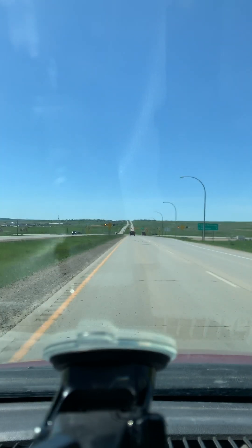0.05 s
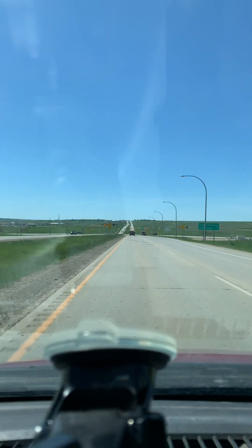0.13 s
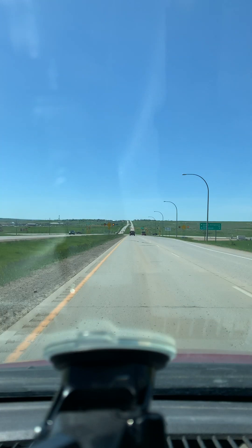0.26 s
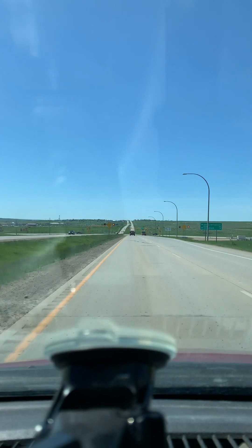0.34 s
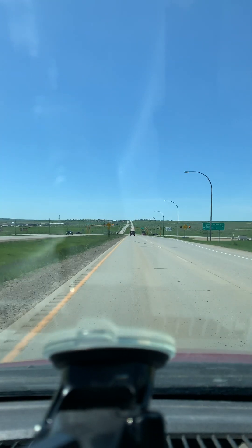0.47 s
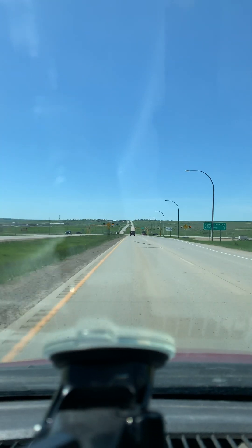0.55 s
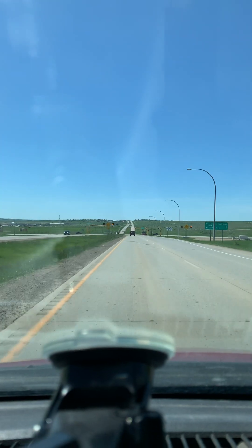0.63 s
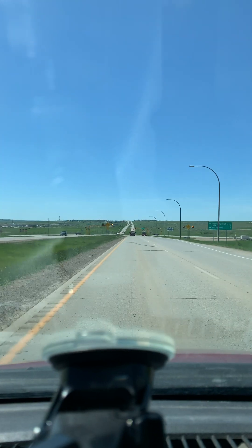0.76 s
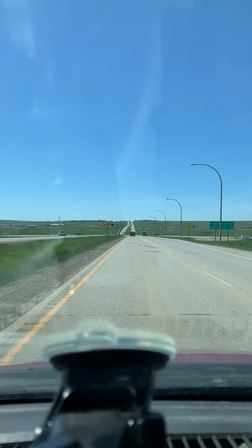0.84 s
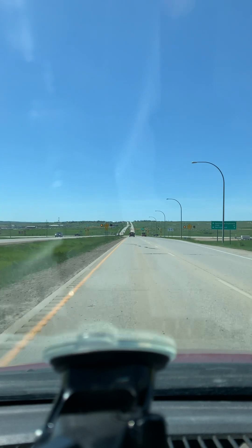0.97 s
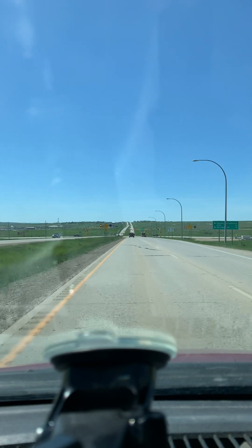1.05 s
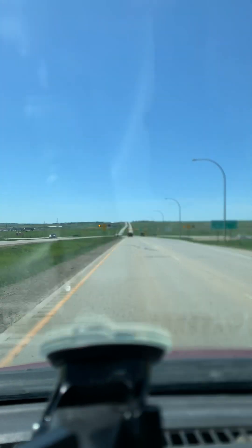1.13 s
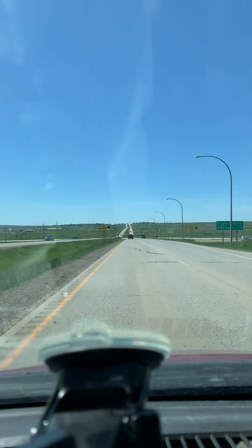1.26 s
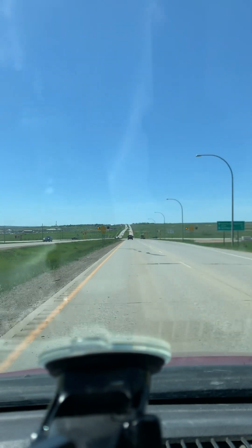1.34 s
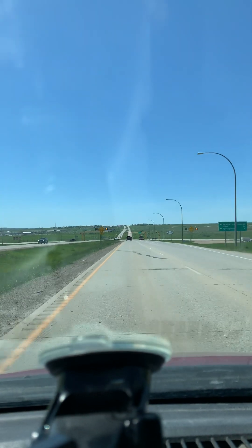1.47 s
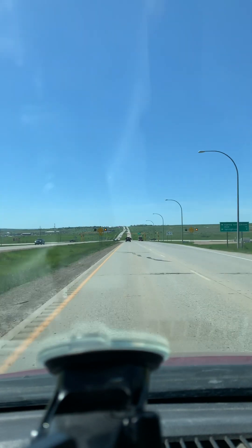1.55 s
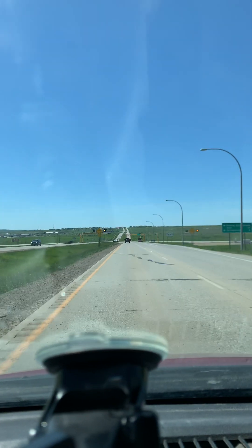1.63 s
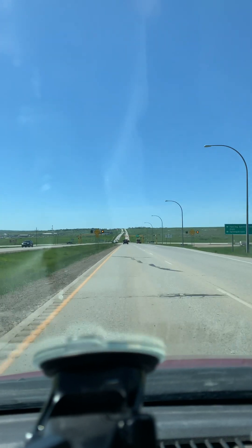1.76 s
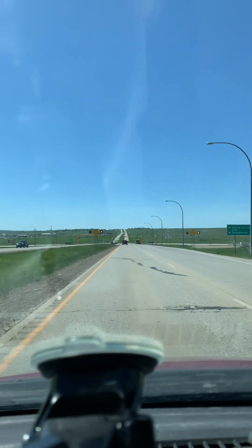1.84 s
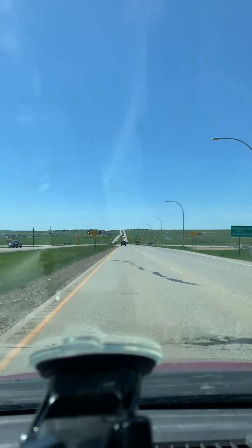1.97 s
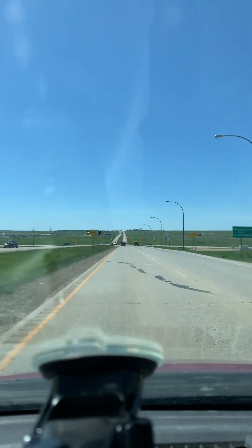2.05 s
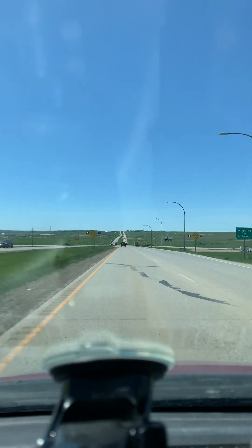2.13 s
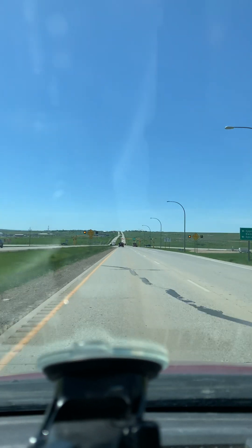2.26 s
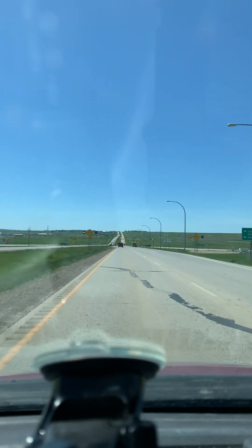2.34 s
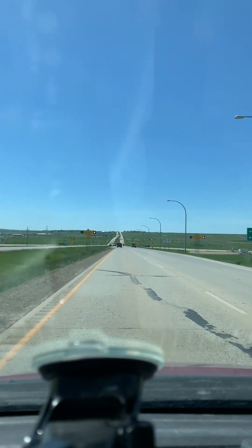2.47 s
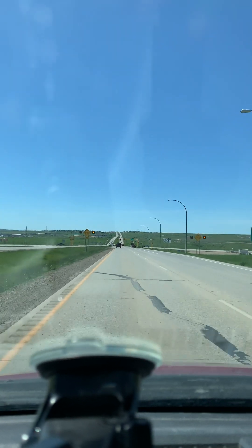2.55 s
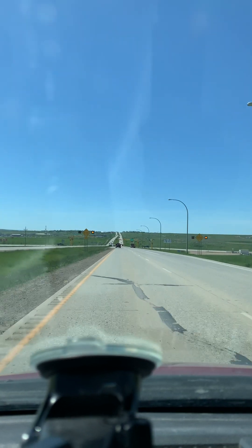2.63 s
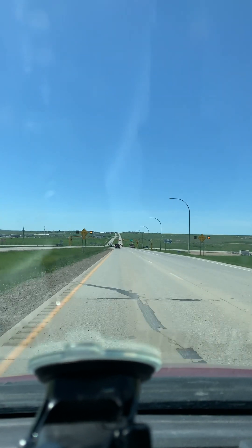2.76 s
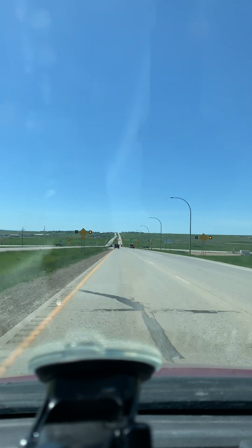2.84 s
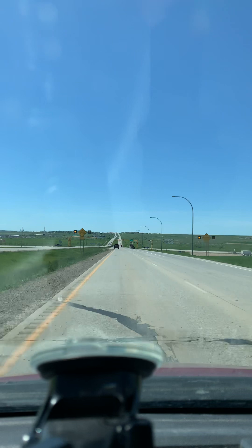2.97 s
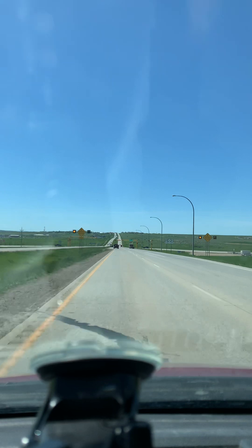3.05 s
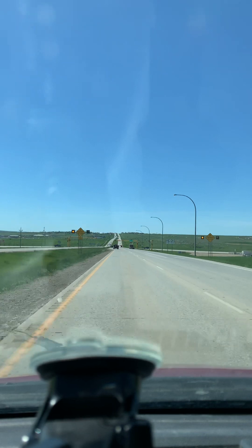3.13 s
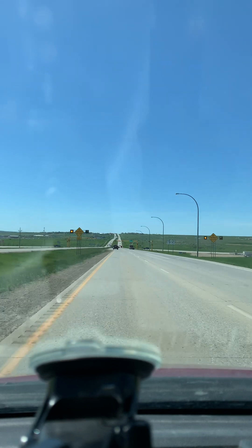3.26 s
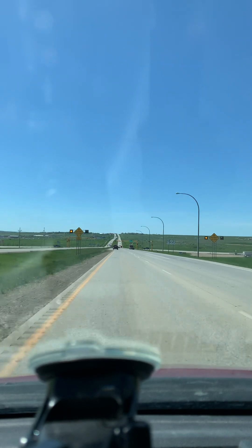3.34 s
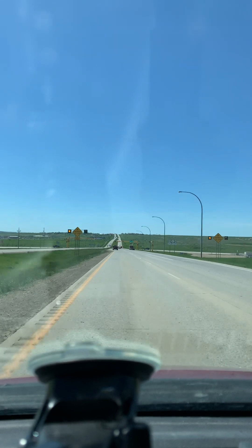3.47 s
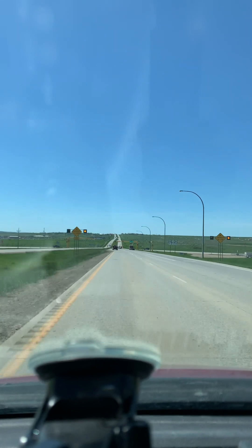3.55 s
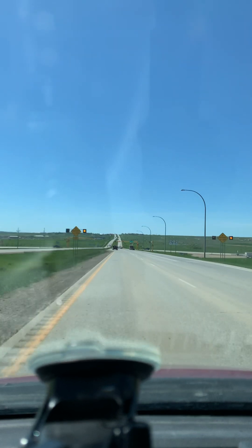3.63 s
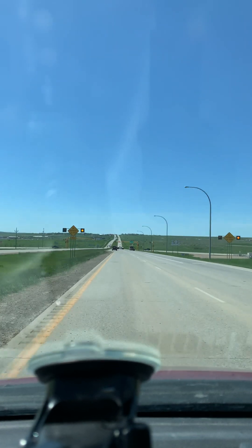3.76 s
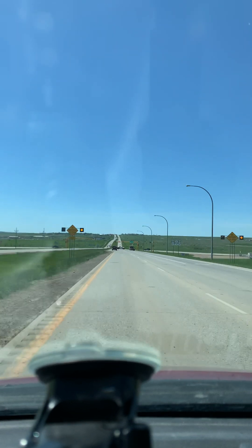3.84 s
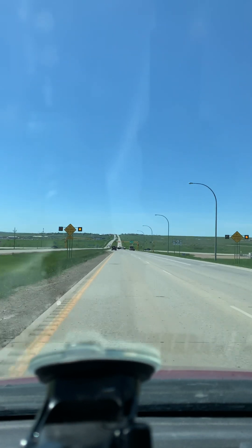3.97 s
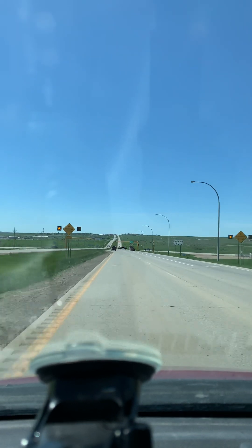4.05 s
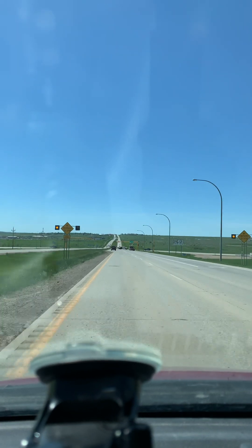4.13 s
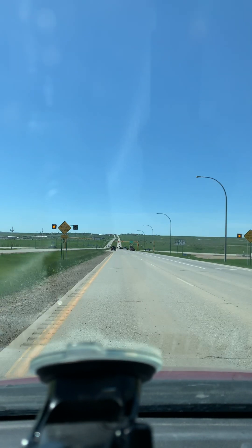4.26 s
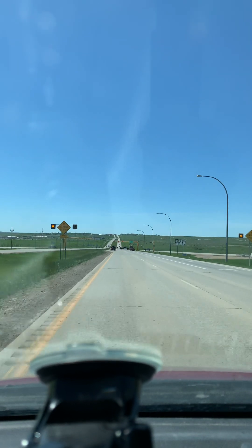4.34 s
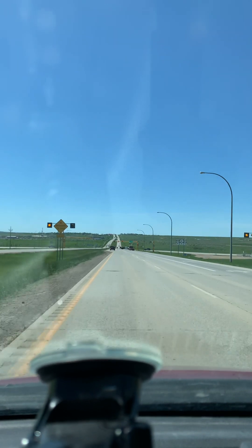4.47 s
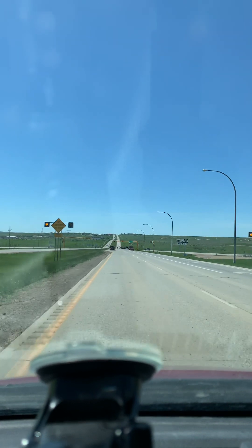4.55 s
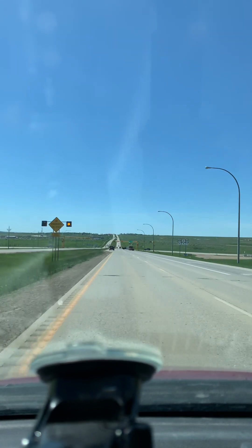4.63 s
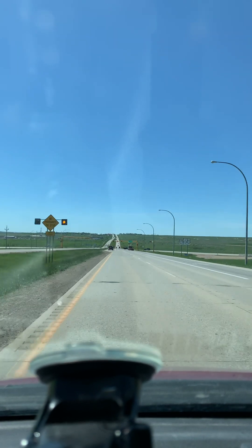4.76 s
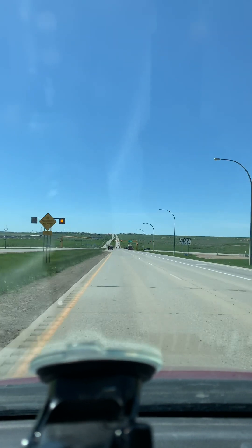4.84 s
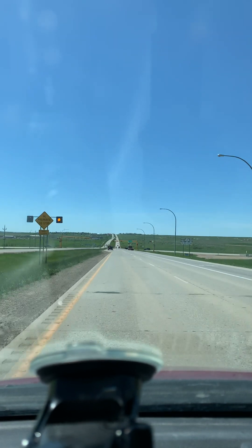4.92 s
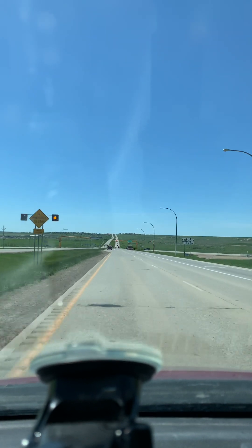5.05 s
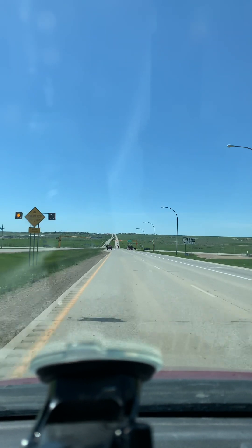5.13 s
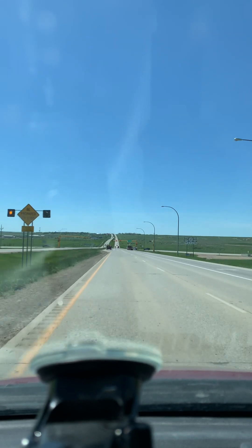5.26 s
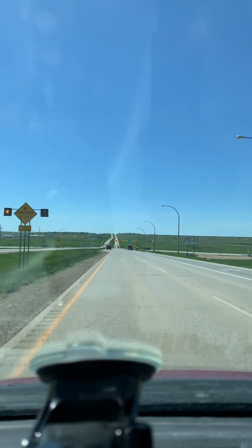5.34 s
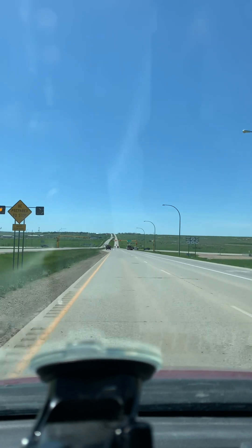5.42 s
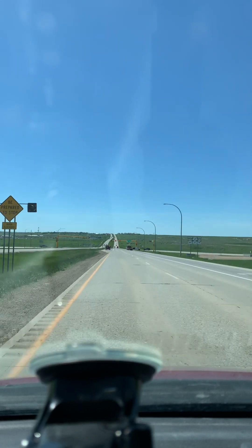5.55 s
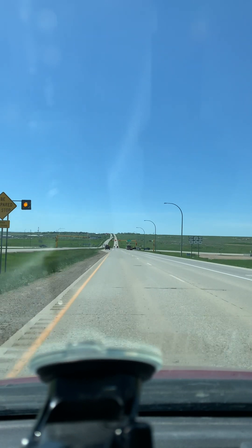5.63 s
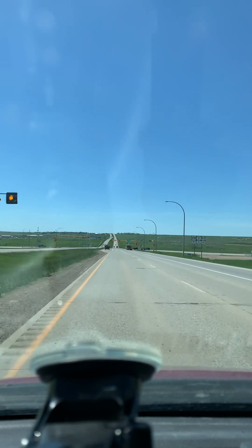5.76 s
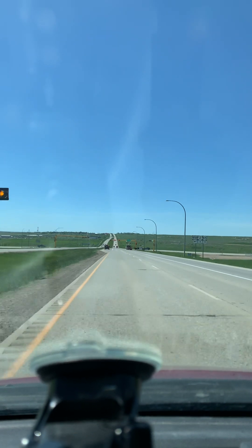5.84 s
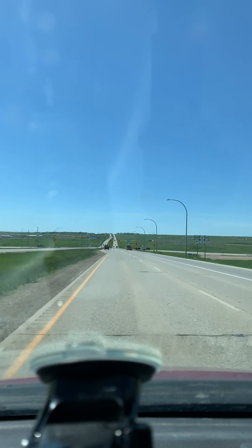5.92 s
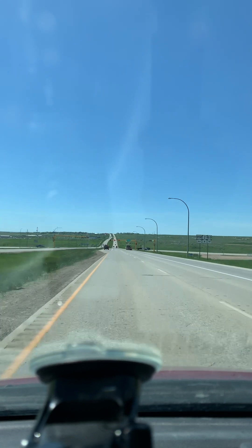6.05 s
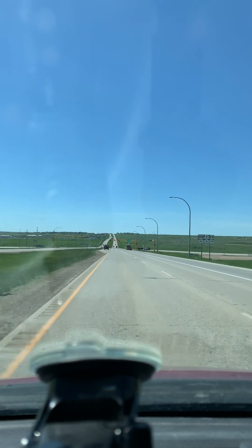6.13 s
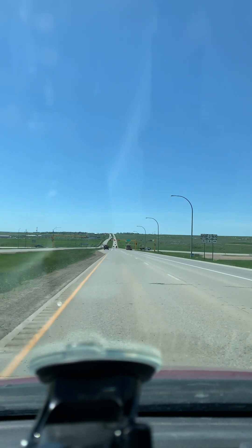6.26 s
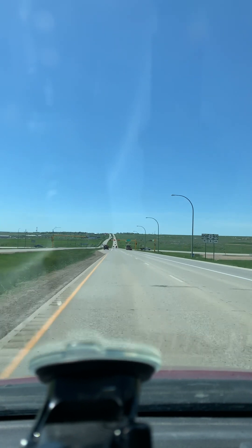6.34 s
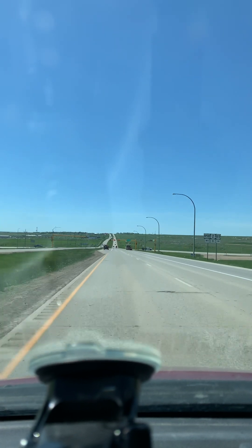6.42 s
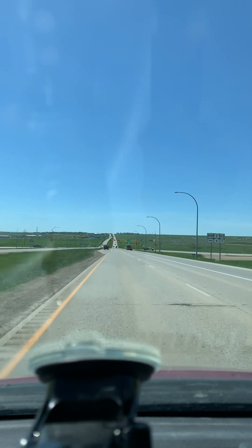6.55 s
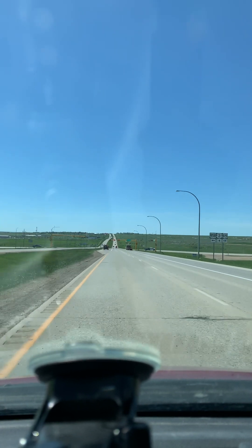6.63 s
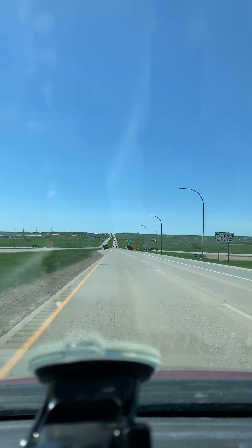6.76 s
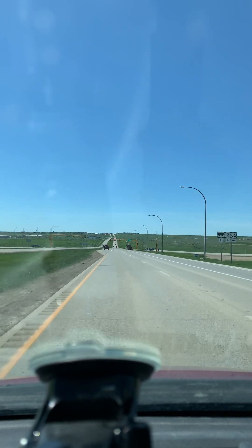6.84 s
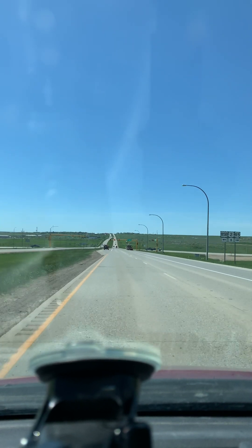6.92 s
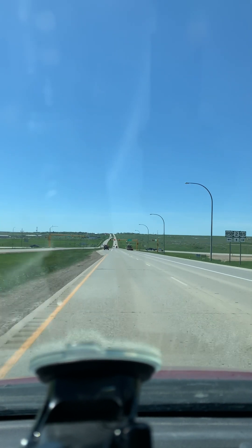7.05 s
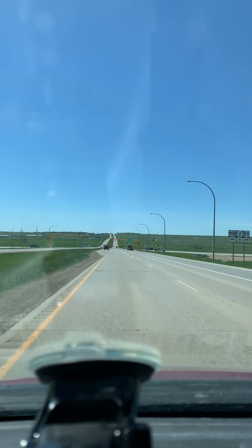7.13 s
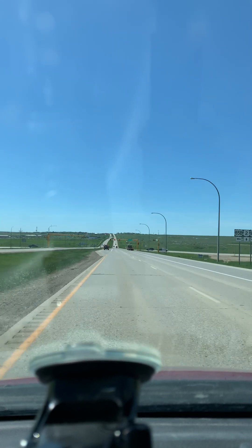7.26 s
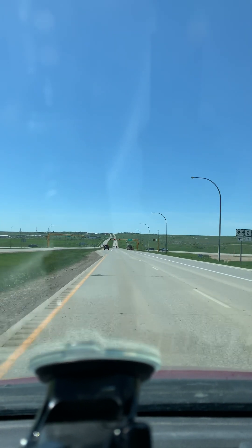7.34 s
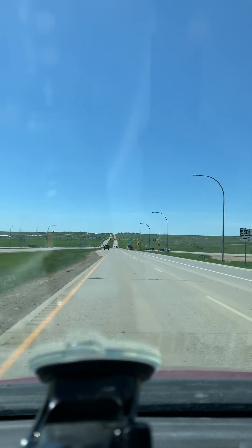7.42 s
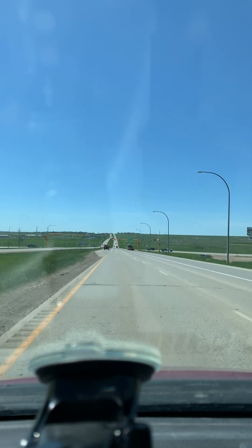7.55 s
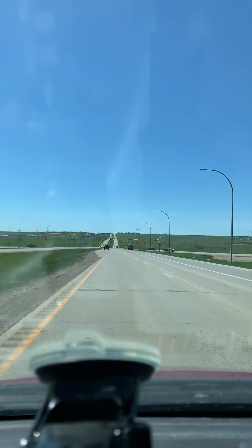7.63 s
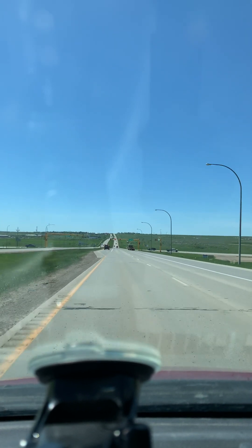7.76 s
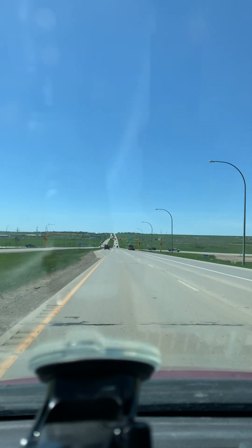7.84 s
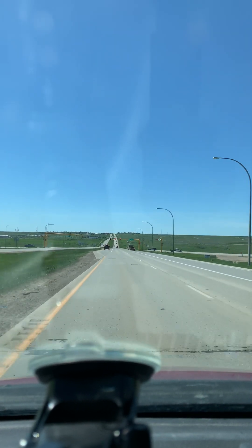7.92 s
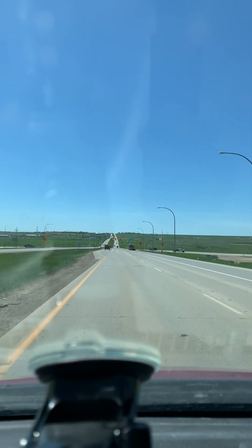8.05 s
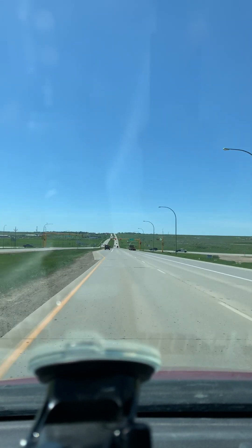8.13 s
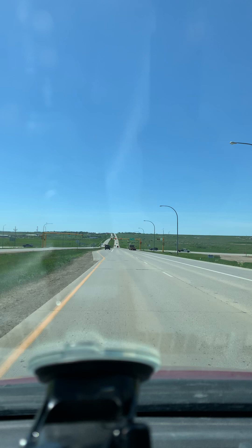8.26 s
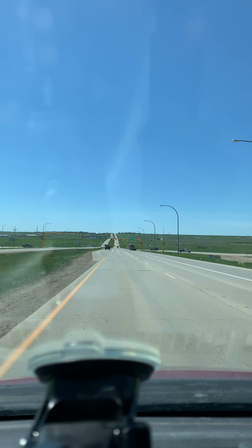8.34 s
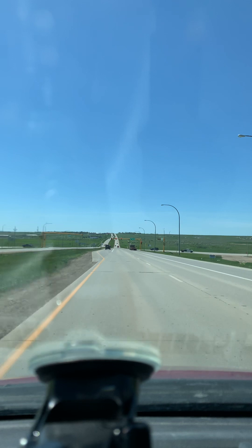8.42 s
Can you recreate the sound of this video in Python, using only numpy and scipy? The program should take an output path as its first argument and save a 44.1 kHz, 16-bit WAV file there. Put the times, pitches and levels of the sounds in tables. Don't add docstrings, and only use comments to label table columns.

```python
import sys
import numpy as np
from scipy import signal
from scipy.fft import rfft, irfft, next_fast_len
from scipy.io import wavfile
from scipy.ndimage import uniform_filter1d

SR = 44100
rng = np.random.default_rng(int(sys.argv[2]) if len(sys.argv) > 2 else 0)


def output_pcm(signal):
    pcm = np.clip(np.atleast_2d(signal).T, -1, 1) * 32767
    wavfile.write(sys.argv[1], SR, np.round(pcm).astype(np.int16))


def decibels_to_gain(level_db):
    exponent = np.asarray(level_db, float) / 20
    return 10 ** exponent


N = 374409
T = np.arange(N) / SR

# t/s, cabin boom level/dB
ROAD_SWELLS = [(0, -36), (.33, -27.5), (.68, -23), (1.05, -26.5), (1.6, -25.5), (2, -28), (2.42, -19.5),
               (2.73, -28.5), (3.1, -24.5), (3.3, -26.5), (3.6, -19.5), (4.6, -24.5), (5.5, -23.5),
               (6.1, -27.5), (6.65, -32.5), (7.25, -23), (7.75, -29), (8.15, -21)]
# t/s, floor jolt/dB, panel jolt/dB, duration/s
ROAD_JOINTS = [(0.296, 2.5, -0.5, 0.26), (0.74, 1.5, 0, .12), (1.613, 4, 1.5, 0.36), (2.3, 9, 0.5, 0.064),
               (3.048, 14, 1, 0.13), (3.325, 2.5, 1.5, 0.06), (4.204, 4, 1, 0.049),
               (4.891, 1.5, 1.5, 0.079), (6.482, 1.5, 3, 0.12), (8.113, 2, -2, 0.1), (8.248, 4, 3.5, 0.19)]
# f/Hz, density/dB per Hz
BOOM_SPECTRUM = [(18, -42.5), (26, -15.5), (33, -20.5), (40, -7), (47, -3), (53, 2.5), (62, -3), (72, -19),
                 (90, -42.5), (200, -88.5), (400, -160)]
# f/Hz, density/dB per Hz
FLOOR_SPECTRUM = [(40, -61), (60, -14), (72, 2), (82, 2), (96, -4), (112, -5), (135, -22.5), (200, -88),
                  (400, -160)]
# f/Hz, density/dB per Hz
BODY_SPECTRUM = [(70, -63.5), (105, -4), (130, -0.5), (200, -4.5), (290, -10.5), (345, -12), (520, -19.5),
                 (900, -48), (1500, -83.5), (3000, -160)]
# f/Hz, density/dB per Hz
ROAR_SPECTRUM = [(300, -42.5), (480, 9), (640, 8.5), (830, 9.5), (1100, 4.5), (1400, -2.5), (2050, -4.5),
                 (2250, -10.5), (3000, -16.5), (4200, -19.5), (5500, -38.5), (7500, -47), (9000, -91)]
# f/Hz, width/Hz, boost/dB
CABIN_MODES = [(860, 6.8, 8), (1211.5, 27, 9.5), (1607, 390, 6.5), (1913, 35, 8.5), (2940, 39, 10)]
# f/Hz, density/dB per Hz
HISS_SPECTRUM = [(3000, -40), (5600, 0), (8000, -3), (8900, -12), (9800, -3), (10700, -2), (10950, 8),
                 (11150, 8), (11400, -3), (15100, -5), (15500, -50)]
# f/Hz, likeness (0 to 1)
PORT_LIKENESS = [(40, .98), (90, .9), (220, .92), (350, .75), (550, .3), (800, .15), (1300, .4),
                 (3400, .45), (4400, .97), (16000, .98)]
# f/Hz, lead/rad
CABIN_LEAD = [(0, 0), (140, -.1), (230, -.4), (600, 0), (1200, 1.7), (2500, 2.5), (3500, 1.7)]
# f/Hz, lead/rad
MOUNT_LEAD = [(0, 0), (400, -.7), (700, -.9), (1300, -.8), (2200, .7), (2600, 1.4), (3500, 1.5)]
# first opposition f/Hz, spacing per turn above it/Hz
PORT_LAG = (4650, 4270)
# t/s, half-order f/Hz, level/dB
ENGINE_DRONE = [
    (0, 73, -33),
    (1.15, 73, -33),
    (1.7, 72, -35),
    (2.15, 68, -35),
    (2.45, 56, -36),
    (2.7, 50, -60),
]
# t/s, level/dB
PANEL_HUM = [
    (3.47, -51.5),
    (3.78, -45),
    (4.1, -55),
]
# f/Hz, level/dB
WHINE_TONES = [(5990, -79.5), (13930, -80), (13500, -92), (14950, -95)]
# one start t/s, period/s, length/s
WHINE_PULSE = (5.068, .08029, .014)
# t/s, peak level/dB
FLASHER_TICKS = [
    (7.1297, -40),
    (7.4819, -39.5),
    (7.832, -40.5),
    (8.1795, -40),
]
# f/Hz, level/dB, t60/s
RELAY_RINGS = [(4780, -8, .008), (5080, -18.5, .008), (5940, -6, 0.011)]
# t/s, rms level/dB, t60/s, centre f/Hz, width/octaves
RUBS = [(0, -52.5, 1.2, 3470, 0.32), (.84, -35.5, 1.04, 780, 0.45), (.845, -40.5, 0.51, 1440, 0.26),
        (.846, -49, .5, 2280, 0.17), (.847, -57, 0.69, 3280, 0.71), (1.115, -51, 0.23, 4420, 0.66),
        (3.84, -52.5, .15, 4020, 0.57), (3.849, -39.5, .042, 3470, .09), (4.12, -48, .09, 3600, 0.26),
        (4.121, -48, 0.095, 6200, 0.3), (4.122, -51.5, .04, 10500, .1), (4.13, -70, 1.3, 7820, 0.77),
        (7.075, -37.5, 0.06, 4300, 1.22), (7.184, -38.5, 0.088, 3280, 1.1),
        (7.184, -42.5, .06, 10500, 0.44), (7.187, -36.5, 0.11, 1500, 0.5), (7.195, -25, 0.1, 585, 0.12),
        (2.674, -44.5, 0.087, 6500, .4), (2.655, -58.5, .15, 4900, 0.082), (1.528, -31, .03, 600, 0.34),
        (3.19, -22, .6, 147.7, .2), (8.19, -21, 0.56, 187, 0.52)]
# t/s, peak level/dB, f/Hz, t60/s
SMALL_RINGS = [(1.1493, -16.5, 11700, 0.0032), (2.0768, -21.5, 10100, 0.0039), (2.66, -62, 4900, .05),
               (1.1502, -13, 1800, 0.0067), (1.1504, -18, 3740, .005), (1.5335, -27, 1650, 0.011),
               (1.534, -33.5, 2150, 0.01), (2.0772, -22, 5350, 0.0065), (2.179, -37, 1900, .006),
               (2.179, -46, 6400, 0.01), (2.3325, -22, 1900, .006), (2.481, -33, 10600, 0.0068),
               (2.578, -30, 3800, 0.0067), (2.682, -27, 2130, .008), (2.682, -28, 3900, 0.004),
               (2.7286, -46, 3620, 0.037), (2.7286, -48, 7000, .006), (2.9645, -33, 2250, .01),
               (2.983, -60, 5400, .008), (3.016, -61, 5500, .008), (3.029, -39, 2400, 0.0095),
               (3.0325, -48, 3900, .006), (4.119, -54, 3500, 0.036), (4.124, -48, 6000, .015),
               (7.077, -49, 2610, 0.018), (7.187, -48, 3600, 0.023)]
# t/s, peak level/dB, tilt/dB per octave, strongest f/Hz
PLASTIC_SNAPS = [(1.1396, -29, -3, 6900), (1.1445, -38.5, -3.5, 5900), (1.1504, -13, -3.5, 5380),
                 (1.1504, -14, 0, 11320), (1.216, -29.5, 0.5, 6470), (1.264, -34, 0, 3420),
                 (1.276, -31, 6, 3700), (1.285, -37, -5.5, 6700), (1.292, -44, 3, 3804),
                 (1.5333, -39, 3.5, 3266), (1.577, -49.5, -10, 4600), (1.7982, -55, -5, 3400),
                 (2.032, -51, -7, 6570), (2.077, -20, -1, 10750), (2.083, -45, -1, 6460),
                 (2.163, -52.5, -5.5, 6490), (2.1799, -45, -11, 6230), (2.184, -39.5, -2, 6700),
                 (2.2021, -35, -4, 3300), (2.3063, -52.5, -8, 6400), (2.3322, -26, 5, 7180),
                 (2.3435, -47, 2.5, 3543), (2.348, -59.5, -7.5, 6700), (2.481, -31, 0.5, 5010),
                 (2.579, -34.5, -3, 6950), (2.688, -43, 2, 10500), (2.6823, -16.5, 2.5, 5593),
                 (2.693, -40, -2.5, 6500), (2.7045, -35.5, 0, 9600), (2.7286, -36.5, -2.5, 3640),
                 (2.7903, -36.5, -1.5, 10000), (2.965, -27, -5, 9800), (2.974, -53.5, 2, 6970),
                 (3.005, -49.5, -0.5, 3940), (3.0333, -46.5, -3.5, 3500)]
# f/Hz, level/dB
PLASTIC_COLOUR = [(500, -69.5), (1500, -13), (2200, -1.5), (2700, -12.5), (3500, -2), (4600, 2.5),
                  (6000, -4.5), (7800, -7.5), (9500, 2.5), (11000, -4.5), (12500, -6), (14000, 1),
                  (15700, -8), (16500, -35)]
# t/s, top octave level/dB
FINGERTIP = [(1.1499, -0.5), (1.276, -4.5), (1.285, -7.5), (2.184, -10.5), (2.2018, -13), (2.481, -4.5),
             (2.578, -12), (2.6822, -12.5), (2.6931, -8), (2.965, 3)]
# t/s, peak level/dB, ring f/Hz, t60/s, thud level/dB
BLOWS = [(1.152, -1.5, 667, 0.019, -1.5), (1.277, -12.5, 890, 0.014, -18), (1.283, -12.5, 740, 0.021, 3.5),
         (1.537, -4, 804, 0.011, -18.5), (1.554, -13.5, 717, 0.0077, -11), (1.571, -16, 860, 0.016, -18.5),
         (1.579, -15, 796, 0.02, 8), (1.714, -10, 604, 0.01, -9.5), (2.0795, 0.5, 792, 0.013, -16),
         (2.205, -5, 766, 0.011, -6), (2.3355, 2, 782, 0.012, -21.5), (2.366, -15.5, 722, 0.006, -31),
         (2.408, -14, 662, 0.011, -15), (2.4845, 0.5, 790, 0.016, -4), (2.684, -1.5, 860, 0.016, 2.5),
         (2.691, -13, 876, 0.016, 10), (2.7135, -14, 720, 0.011, 1), (2.7865, -12, 772, 0.012, -16),
         (2.795, -9, 724, 0.0087, -12.5), (2.842, -17, 636, 0.011, -25), (2.969, -5.5, 749, 0.0092, -2.5),
         (2.979, -15.5, 906, 0.0083, -23), (2.985, -16, 840, 0.01, -21.5),
         (3.007, -11.5, 881, 0.0082, -18.5), (3.017, -11, 910, 0.0092, -24),
         (3.035, -6.5, 622, 0.011, -5.5)]
# t/s, peak level/dB, ring f/Hz
FINGER_TAPS = [(1.128, -17, 720), (1.142, -20, 841), (1.148, -17, 640), (1.157, -17, 760),
               (1.165, -27, 600), (1.243, -33, 662), (1.266, -21, 860), (1.337, -27, 820),
               (1.588, -21, 850), (1.802, -25, 780), (2.012, -25, 665), (2.035, -25, 750),
               (2.062, -28.5, 740), (2.092, -33, 800), (2.166, -28, 778), (2.181, -18, 915),
               (2.309, -25.5, 750), (2.327, -27, 480), (2.388, -19, 640), (2.553, -32, 640),
               (2.577, -26, 800), (2.677, -21, 850), (2.706, -27, 850), (2.0835, -14.5, 470),
               (2.695, -15, 420), (2.7, -22, 700), (2.705, -20, 400), (1.154, -16, 475), (7.19, -25.5, 620)]
# t/s, clack level/dB
LOOSE_CLAMP = [(1.142, -35), (1.266, -30), (1.277, -26.5), (1.554, -29), (1.802, -30), (2.035, -36),
               (2.0795, -15.5), (2.18, -30), (2.205, -19), (2.3355, -14.5), (2.366, -37), (2.388, -38),
               (2.408, -32), (2.577, -42), (2.794, -22), (2.842, -38), (2.969, -35), (2.979, -23),
               (2.985, -23.5), (3.007, -18), (3.017, -37), (3.035, -27.5)]
# t/s, arm left-right level/dB, extra left lead/rad, cradle f/Hz
HAND_GRIPS = [(1.152, -1.5, 1.1, 465.4), (1.277, -3.5, 0.28, 492), (1.283, -1.5, 0.42, 358),
              (1.537, -3, -0.0014, 290), (1.571, -3, 0.06, 560), (1.579, -5, 0.59, 291.6),
              (1.714, -1, -.1, 510), (2.0795, -0.5, 0, 489.5), (2.181, -4, .7, 379.5), (2.205, 0.5, 0, 503),
              (2.3355, -4, 0, 568), (2.408, -0.5, -.2, 510), (2.4845, 0.5, -.1, 340.6), (2.684, 6, .6, 315),
              (2.691, 1, 0.0043, 328), (2.714, 2.5, 1, 544), (2.786, 4, 0.9, 550), (2.795, 1, 0.66, 517),
              (2.842, 0, -.1, 560), (2.969, 1.5, .3, 272.7), (3.035, -1.5, -0.3, 557)]
# t/s, depth/dB, fall/s, recovery/s
GAIN_DUCKS = [
    (1.178, -17, 0.02, 0.056),
    (2.501, -3, 0.014, 0.049),
    (2.699, -4.5, 0.045, 0.066),
]

DRUM_DB, BODY_DB, ROAR_DB = -25, -28.5, -46
TYRE_JOLT, FLOOR_SWELL, PANEL_SWELL = 0.16, 0.059, 0.072
HUM_HZ, HUM_GLIDE_HZ_PER_S = 750, 76
RUB_RISE_S, RUB_RISE_SHARE = 0.0053, 0.021
SNAP_T60, SOFT_SNAP_DB = 0.0024, -32.5
HARDENS = 0.53
RATTLE_DB, RATTLE_LAGS = -31.5, 1.8
TAP_T60, TAP_THUD_DB, CLACK_DB = 0.014, 0, -40
THUD_LATE_S = .003
GRIT, GRIT_PER_DB = .14, .014
SAG = 0.017
SHUDDER_DB, SHUDDER_T60 = -33, 0.039


def unit(x):
    return x / np.sqrt(np.mean(x ** 2) + 1e-20)


def along(points, hz):
    f, v = np.transpose(points)
    return np.interp(np.log(hz + 1), np.log(f + 1), v)


def curves(rows):
    s, *cols = np.transpose(rows)
    return [np.interp(T, s, c) for c in cols]


def at(table, s, usual):
    return next((row for when, *row in table if abs(when - s) < .003), usual)


def add(track, s, sound):
    part = track[..., round(s * SR):][..., :sound.shape[-1]]
    part += sound[..., :part.shape[-1]]


def filtered(x, response):
    m = next_fast_len(x.shape[-1] + 2048)
    spectrum = rfft(x, m) * response(np.fft.rfftfreq(m, 1 / SR))
    return irfft(spectrum, m)[..., :x.shape[-1]]


def ports(x, lead):
    f, radians = np.transpose(lead)
    opposed, turn = PORT_LAG
    f = [*f, opposed, opposed + 4 * turn]
    radians = [*radians, np.pi, 9 * np.pi]
    x = np.pad(x, [(0, 0), (1024, 1024)], mode="reflect", reflect_type="odd")
    shift = lambda hz: np.exp(.5j * np.outer([1, -1], np.interp(hz, f, radians)))
    return filtered(x, shift)[:, 1024:-1024]


def rush(spectrum, patchy_db, steady):
    z = signal.stft(rng.standard_normal((2, N)), nperseg=1024)[2]
    field = uniform_filter1d(rng.standard_normal(z.shape[1:]), size=8, axis=0)
    field = uniform_filter1d(field, size=6, axis=1)
    pair = signal.istft(z * decibels_to_gain(patchy_db * unit(field)), nperseg=1024)[1][:, :N]
    turn = lambda hz: np.arccos(np.clip(along(PORT_LIKENESS, hz), 0, 1)) / 2
    mid, side = filtered(pair, lambda hz: decibels_to_gain(along(spectrum, hz)) * [np.cos(turn(hz)), np.sin(turn(hz))])
    x = unit(np.array([mid + side, mid - side]))
    swell = abs(uniform_filter1d(np.mean(x ** 2, axis=0), size=3000)) + 0.081
    return unit(x / swell ** (steady / 2))


def hiss():
    return decibels_to_gain(-83.0) * rush(HISS_SPECTRUM, patchy_db=2.0, steady=0)


def whine():
    start, period, length = WHINE_PULSE
    gate = uniform_filter1d(1. * ((T - start) % period < length), size=90)
    return gate * sum(decibels_to_gain(db) * np.sin(2 * np.pi * hz * T) for hz, db in WHINE_TONES)


def panel_hum():
    db, = curves(PANEL_HUM)
    start, end = PANEL_HUM[0][0], PANEL_HUM[-1][0]
    waver_hz = 3 * np.sin(2 * np.pi * 3.6 * T) + 2 * np.sin(2 * np.pi * 9.1 * T)
    on = np.interp(T, [start, start + .08, end - .08, end], [0, 1, 1, 0])
    hz = HUM_HZ + HUM_GLIDE_HZ_PER_S * (T - start) + waver_hz
    level = np.sqrt(2) * on * decibels_to_gain(db - 0.5 + 0.84 * waver_hz[::-1])
    return level * np.sin(2 * np.pi * np.cumsum(hz) / SR)


def engine():
    hz, db = curves(ENGINE_DRONE)
    drift = uniform_filter1d(rng.standard_normal(N), size=6000)
    drift = unit(uniform_filter1d(drift, size=6000))
    turn = 2 * np.pi * np.cumsum(hz) / SR + .5 * drift[::-1]
    firing = np.interp(T, [1.2, 2.1], [1, .3]) * np.sin(2 * turn)
    half_order = 2.0 * np.sin(turn)
    return decibels_to_gain(db + 3.2 * drift) * np.sqrt(2) * (firing + half_order)


def low_swings():
    opening = decibels_to_gain(-7.5 - 60 * T / 0.071) * np.cos(2 * np.pi * 60 * T)
    late = np.clip(T - 3.062, 0, None)
    ridge = decibels_to_gain(-1.5 - 60 * late / 0.069) * np.sin(2 * np.pi * 62 * late) * (1 - np.exp(-late / 0.0047))
    return opening + ridge


def road():
    boom_db, = curves(ROAD_SWELLS)
    swell_db = boom_db - boom_db.mean()
    jolts = [np.outer(db, np.exp(-((T - s) / lasts) ** 2)) for s, *db, lasts in ROAD_JOINTS]
    floor_db, panel_db = sum(jolts)
    boom = decibels_to_gain(boom_db + 4.0) * rush(BOOM_SPECTRUM, patchy_db=0.87, steady=0.14)
    drum_level = decibels_to_gain(DRUM_DB + FLOOR_SWELL * swell_db + floor_db)
    drum = low_swings() + drum_level * rush(FLOOR_SPECTRUM, patchy_db=1.5, steady=0.26)
    body_level = decibels_to_gain(BODY_DB + PANEL_SWELL * swell_db + panel_db)
    body = body_level * rush(BODY_SPECTRUM, patchy_db=2.0, steady=0.1)
    cabin = lambda hz: decibels_to_gain(sum(db / (1 + (2 * (hz - c) / w) ** 2) for c, w, db in CABIN_MODES))
    roar = filtered(rush(ROAR_SPECTRUM, patchy_db=2.0, steady=0), cabin)
    roar = decibels_to_gain(ROAR_DB + TYRE_JOLT * panel_db) * roar
    return (boom + drum + body + roar) * decibels_to_gain([[.3], [-.3]])


def flasher():
    out, t = np.zeros(N), T[:SR // 10]
    held = np.clip(t - .006, 0, None)
    tick = sum(decibels_to_gain(db - 60 * held / t60) * np.sin(2 * np.pi * hz * t) for hz, db, t60 in RELAY_RINGS)
    tick = tick * (1 - np.exp(-t / 0.0017))
    for s, db in FLASHER_TICKS:
        noise = rng.standard_normal(len(t))
        housing = unit(filtered(noise, lambda f: 1 / (1 + ((f - 2550) / 330) ** 4)))
        add(out, s, decibels_to_gain(db + 12.0) * housing * t / 0.031 * np.exp(-t / 0.005))
        for delay, echo_db in [(0, -4), (.011, -15), (.02, -21), (.033, -28)]:
            add(out, s + delay, decibels_to_gain(db + echo_db) * tick)
    return out


def scrapes():
    out, t = np.zeros(N), T[:SR // 2]
    for s, db, t60, hz, wide in RUBS:
        noise = rng.standard_normal(len(t))
        band = unit(filtered(noise, lambda f: (f < 15700) / (1 + (np.log2((f + 1) / hz) / wide) ** 6)))
        rise = 1 - np.exp(-t / (RUB_RISE_S + RUB_RISE_SHARE * t60))
        add(out, s, decibels_to_gain(db - 60 * t / t60) * rise * band)
    return out


def pings():
    out, t = np.zeros(N), T[:SR // 16]
    for s, db, hz, t60 in SMALL_RINGS:
        shape = decibels_to_gain(db + 7.5 - 60 * t / t60) * (1 - np.exp(-t / .0007)) ** 2
        add(out, s, shape * np.sin(2 * np.pi * hz * t))
    return out


def snaps():
    out, t = np.zeros(N), T[:SR // 10] - 1000 / SR
    after, before = np.clip(t, 0, None), np.clip(-t, 0, None)
    for s, db, tilt_db, ring_hz in PLASTIC_SNAPS:
        noise = rng.standard_normal(len(t))
        harder_db = max(db - SOFT_SNAP_DB, 0)
        life = SNAP_T60 * decibels_to_gain(-HARDENS * harder_db)
        crack = noise * (1 - np.exp(-after / 0.00072)) * decibels_to_gain(-60 * after / life)
        creak_db = RATTLE_DB - RATTLE_LAGS * harder_db - 60 * before / 0.0079 - 3.01 * (t < 0)
        rattle = noise * decibels_to_gain(creak_db) * (decibels_to_gain(-60 * after / 0.052) + decibels_to_gain(-17.5 - 60 * after / 0.17))
        top_db, = at(FINGERTIP, s, [0])
        mode = lambda hz: 1 + 3j * hz * 900 / (ring_hz ** 2 - hz ** 2 + 900j * hz)
        tilt = lambda hz: tilt_db * np.log2((hz + 800) / 6000)
        muffle = lambda hz: top_db / (1 + (12500 / (hz + 1)) ** 8)
        colour = lambda hz: decibels_to_gain(along(PLASTIC_COLOUR, hz) + tilt(hz) + muffle(hz))
        snap = filtered(crack, lambda hz: mode(hz) * colour(hz))
        snap = snap + filtered(rattle, lambda hz: 3.2 * colour(hz) / (1 + (hz / 7500) ** 2))
        add(out, s + t[0], decibels_to_gain(db + 9.0) * snap / abs(snap).max())
    return out


def knocks():
    out, t, sides = np.zeros((2, N)), T[:SR // 16], np.array([[.5], [-.5]])
    shape = lambda life, rise: decibels_to_gain(-60 * t / life) * (1 - np.exp(-t / rise)) ** 3

    def band(noise, centre, wide):
        octaves = lambda f: np.log2((f + 1) / centre) / wide
        return unit(filtered(noise, lambda f: 1 / (1 + octaves(f) ** 4) / (1 + (f / 2400) ** 6)))

    taps = [(s, db, hz, TAP_T60, TAP_THUD_DB - 30 * (hz < 500)) for s, db, hz in FINGER_TAPS]
    for s, db, hz, t60, thud_db in [*BLOWS, *taps]:
        u, noise = rng.random(2), rng.standard_normal((2, len(t)))
        clack_db = max([CLACK_DB] + [level for when, level in LOOSE_CLAMP if abs(when - s) < .003])
        pan_db, lead, thud_hz = at(HAND_GRIPS, s, (-1.5, .6 * u[0] - .3, 310 + 90 * u[1]))
        grit = band(noise[0], 570, 0.85)
        ring = np.sin(2 * np.pi * hz * t * (1 + SAG * (.5 - t / t60)) + lead * sides)
        arm = (ring + (GRIT - GRIT_PER_DB * db) * grit) * decibels_to_gain(pan_db * sides) * shape(t60, 0.18 * t60)
        clack = decibels_to_gain(clack_db - db - 8.0) * band(noise[1], 1350, 0.23) * shape(0.72 * t60, 0.07 * t60)
        shudder = decibels_to_gain(SHUDDER_DB) * grit * shape(SHUDDER_T60, 0.0029)
        add(out, s - .001 - 0.13 * t60, decibels_to_gain(db + 18.5) * (arm + clack + shudder))
        thud = np.sin(2 * np.pi * thud_hz * t - .4 * sides) * shape(0.52 * t60, 0.1 * t60)
        thud = decibels_to_gain(thud_db + 4.0 + 1.5 * sides) * thud
        add(out, s - .001 - 0.11 * t60 + THUD_LATE_S, -decibels_to_gain(db + 17.5) * thud)
    return out


def scene():
    cabin = hiss() + whine() + panel_hum() + engine() + road()
    near = flasher() + scrapes() + pings() + snaps() + knocks()
    return ports(cabin, CABIN_LEAD) + ports(near, MOUNT_LEAD)


def top_cut(x):
    return signal.sosfilt(signal.butter(12, 16790, fs=SR, output="sos"), x)


def record(dry):
    duck_db = 0
    for s, db, fall, recovery in GAIN_DUCKS:
        late = np.clip(T - s, 0, None)
        duck_db = duck_db + 2 * db * (1 - np.exp(-late / fall)) * np.exp(-late / recovery)
    fade_out = np.minimum(1, (T[-1] - T) / .004 + .15)
    x = dry * decibels_to_gain(duck_db) * fade_out
    x = x / (1 + abs(x / .98) ** 6) ** (1 / 6)
    return top_cut(x)


dry = scene()
out = record(dry)
output_pcm(out)
```